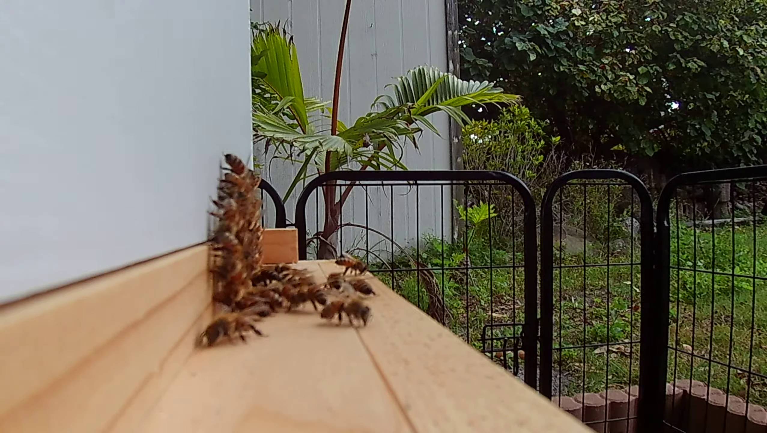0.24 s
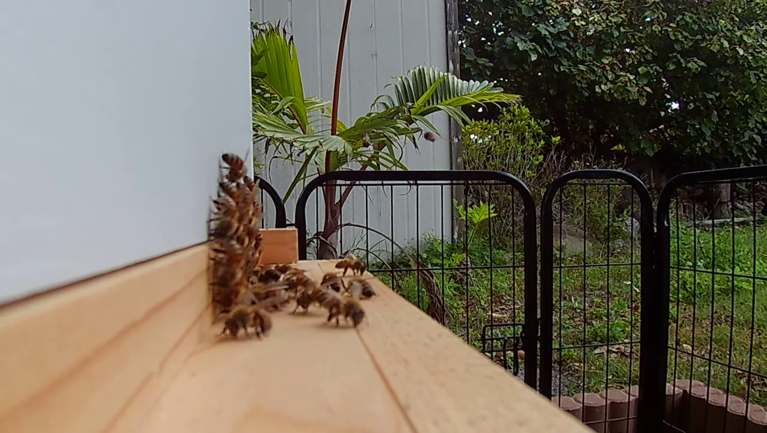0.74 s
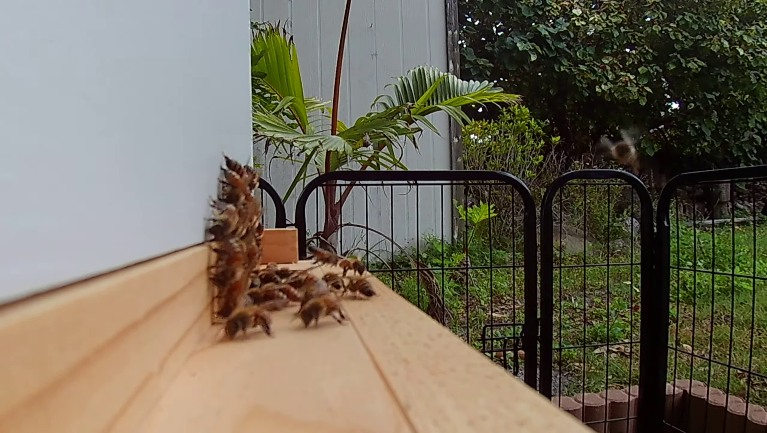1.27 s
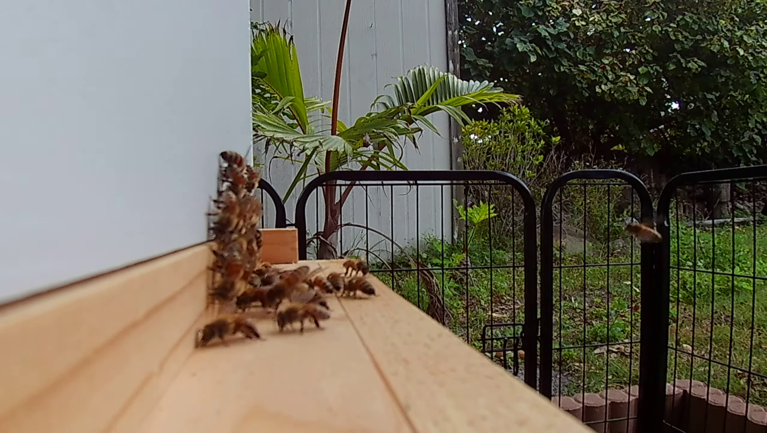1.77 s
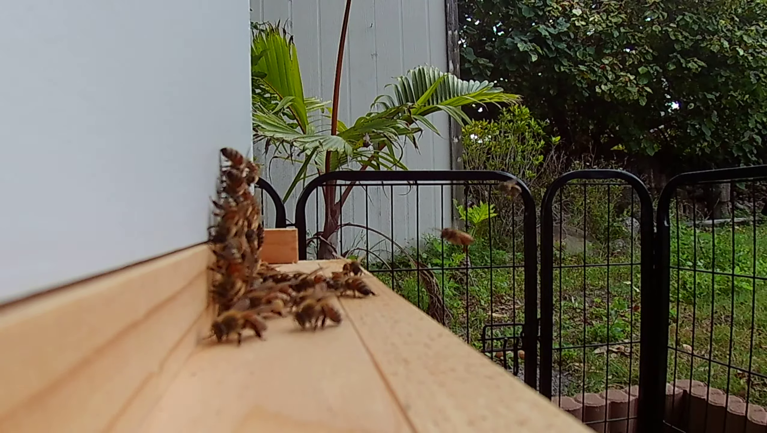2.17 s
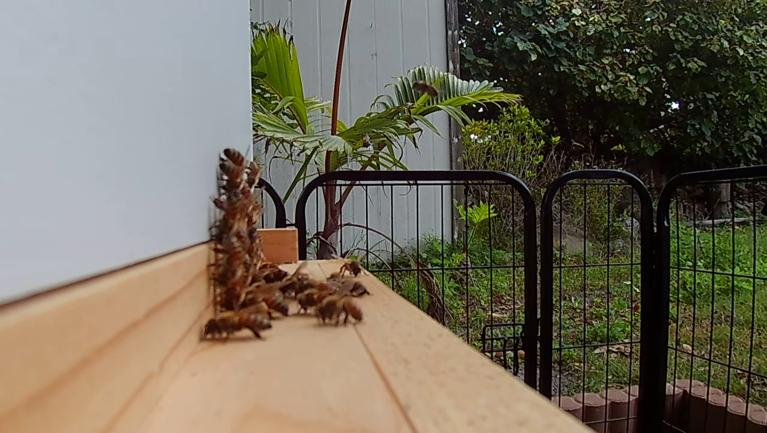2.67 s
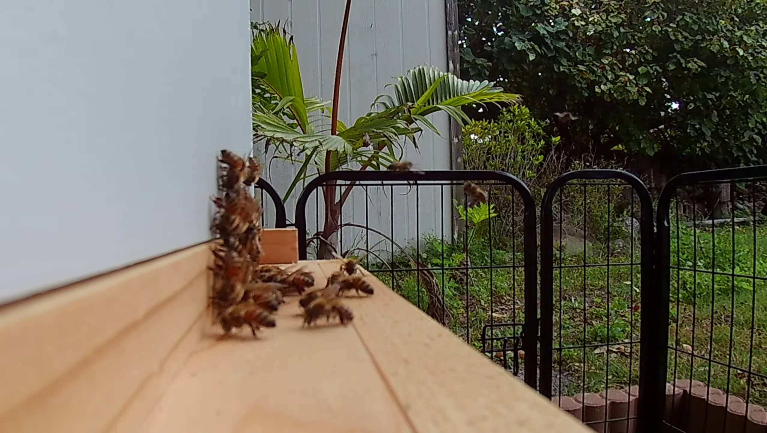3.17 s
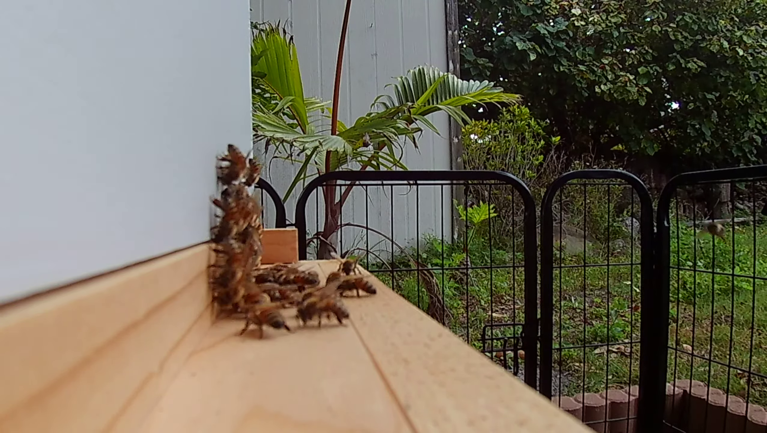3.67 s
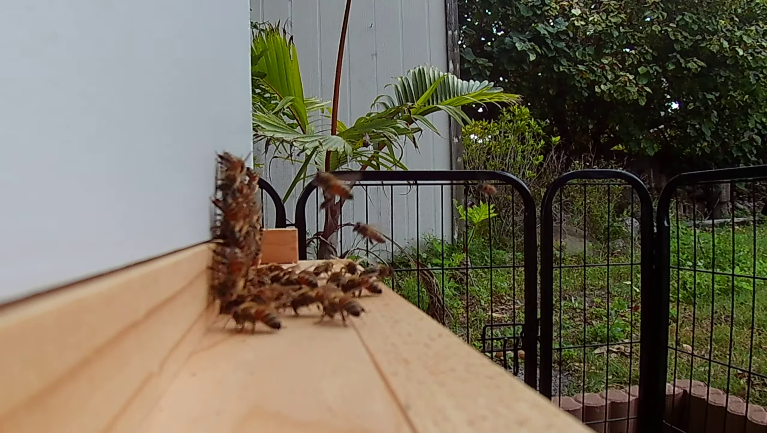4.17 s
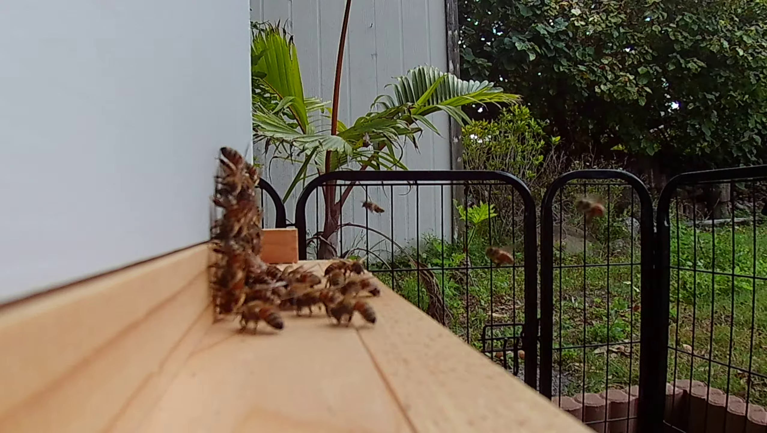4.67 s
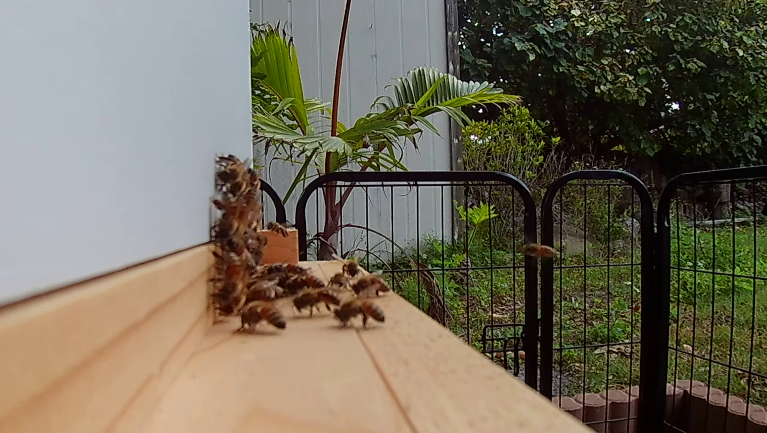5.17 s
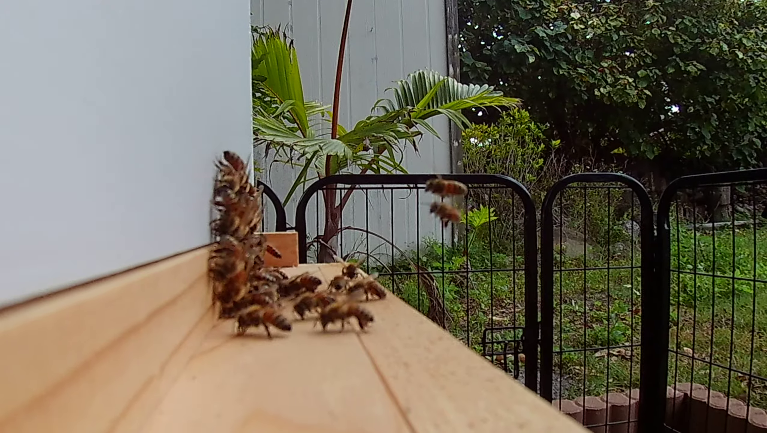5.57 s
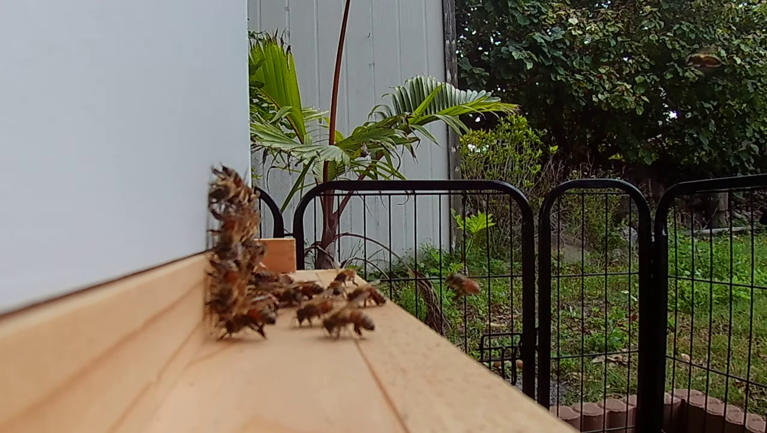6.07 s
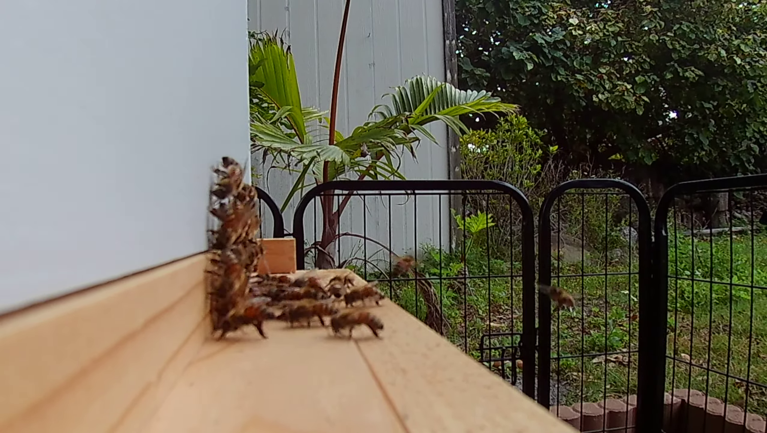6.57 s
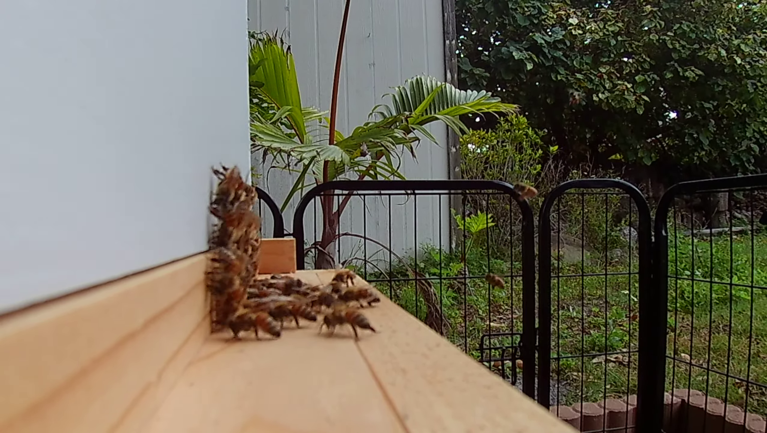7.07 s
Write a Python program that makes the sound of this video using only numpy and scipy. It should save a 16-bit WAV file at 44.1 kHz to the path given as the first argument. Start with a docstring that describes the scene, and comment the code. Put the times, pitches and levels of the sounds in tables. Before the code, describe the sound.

Close single-channel pickup beside a hive entrance outdoors. At first there is only dull, distant air noise, then bees drift in with low fluttering buzzes, some rounder and closer, others brief passing hums. Fine scratchy rustling stays very faint. Past the middle, something small brushes the microphone and raps it twice, dry and abrupt, far louder than the bees, before thin wavering hums resume.

```python
"""Bees at a hive entrance

A quiet garden from the landing board: distant outdoor noise in the air, filtered from random noise.
Close by, feet and wings rustle and scratch on the wood, as filtered grains that come in spurts.
Foragers hum further off and single wing tones waver past, harmonic series gaining bass as they near.
Something small, likely a bee, brushes the microphone's case and knocks on it hard twice, among
lighter touches: decaying modes of the case, each contact with a brief noisy tail.
"""
import sys
import numpy as np
from scipy import signal
from scipy.fft import rfft, irfft
from scipy.io import wavfile

SR = 44100
rng = np.random.default_rng(int(sys.argv[2]) if len(sys.argv) > 2 else 0)


def transcribe(signal):
    """Save signal, clipped to [-1, 1], as a 16-bit WAV file at the path in sys.argv[1]."""
    frames = np.atleast_2d(signal).T
    limited = np.clip(frames, -1, 1)
    pcm = np.round(limited * 32767).astype(np.int16)
    wavfile.write(sys.argv[1], SR, pcm)


N = 323253
TIME = np.arange(N) / SR  # s

# Spectrum of the distant garden air: (frequency [Hz], relative density [dB per Hz])
AIR_SPECTRUM = [(20, -17), (35, 0), (65, 1), (120, -1), (190, -7), (330, -9), (700, -10.5), (1250, -12),
                (1700, -19.5), (2300, -29), (3000, -34), (4000, -30.5), (7000, -41), (7900, -57),
                (9300, -43), (12000, -47.5), (13100, -35), (14000, -47.5), (15500, -44.5)]
# Rustle of the bees on the board, before its spurts: (time [s], level [dB])
RUSTLE_LEVEL = [(0, -80), (.35, -84), (.85, -78), (1, -83), (1.15, -78), (1.6, -85), (1.72, -69.5),
                (2.1, -86), (2.45, -78), (3.8, -85.5), (4.4, -76), (4.7, -81), (5.1, -74), (5.4, -73.5),
                (5.9, -73), (6.2, -78), (7.33, -87)]
# Feet, wings and bodies rubbing close to the microphone:
# (time [s], level before fading [dB], centre [Hz], sharpness [Q], length [s])
SCRATCHES = [(0.051, -52.5, 4500, 3.3, 0.0039), (1.903, -60, 3860, 2.4, 0.016),
             (1.964, -54, 4610, 1.84, 0.0055), (4.906, -51.5, 7490, 1.4, 0.0028),
             (5.237, -46.5, 1550, 1.5, 0.02), (5.239, -54.5, 4600, 3.4, 0.021),
             (5.244, -54, 8800, 11, 0.011), (5.273, -52.5, 1068, 1.5, 0.61), (5.275, -44.5, 950, 3.6, .012),
             (5.29, -55, 10300, 2.4, 0.0097), (5.291, -53, 1300, 1.3, .024), (5.332, -63, 1300, 1.3, .007),
             (5.334, -58.5, 4100, 2.3, .005), (5.373, -64.5, 3900, 2.7, 0.11), (5.411, -67, 4600, 2, .005),
             (5.424, -64.5, 4000, 2, .005), (5.696, -58, 8760, 5, 0.005), (5.7375, -37, 3600, 2.7, 0.008),
             (5.745, -38, 4020, 5.5, 0.022), (5.755, -44.5, 1004, 1.3, 0.13),
             (5.762, -39, 1190, 1.3, 0.021), (5.762, -59, 5240, 2.5, 0.017), (5.791, -48, 55.7, 0.75, 0.11),
             (5.7948, -55.5, 5400, 3, 0.0031), (5.802, -62, 5360, 1.6, 0.0034), (5.822, -60, 6500, 1, .003),
             (5.8775, -56, 4110, 3, .004), (6.412, -69, 6760, 1.36, 0.1), (6.501, -54.5, 4980, 3.8, 0.0073)]
# Foragers further off, how busy the entrance is: (time [s], level [dB])
CROWD_LEVEL = [(0, -89), (.8, -68.5), (1.3, -60.5), (2.2, -65.5), (3, -71), (3.6, -60), (4.3, -62.5),
               (5.1, -61), (5.8, -57.5), (6.2, -63), (6.8, -62), (7.33, -62)]
# Overtones of a wingbeat, one a row from the third harmonic up: (relative level [dB])
OVERTONE_LEVELS = [-0.5, -0.5, -1, -6.5, -7, -17, -21, -20.5, -20, -19.5]
# Wing hums near the board, one path a row. In turn: a bee comes up; a close hum, perhaps of two or three
# bees, swells three times; one hovers; one hum comes and goes until a contact; one drifts past with
# quicker wings; one arrives, sags, picks up.
# (fundamental [dB], overtones [dB], lead of the fifth harmonic [dB], path), the first two at CLOSE_DB;
# path: (time [s], wingbeat [Hz], octave level [dB])
FLIGHTS = [ (-6, -10, 12, [(.9, 222, -78), (1.15, 218.1, -90), (1.19, 222.6, -75), (1.24, 235.3, -68),
           (1.275, 234.3, -63), (1.305, 220, -72), (1.345, 229.7, -62), (1.42, 219, -76)]),
           (-1, -4, 1.3, [(1.4, 236.3, -67), (1.45, 237.8, -59), (1.5, 226.1, -55), (1.55, 213.6, -62),
           (1.6, 228.9, -57.5), (1.64, 220.7, -56.5), (1.71, 212.6, -61.5), (1.77, 212.9, -61.5),
           (1.81, 208.7, -62), (1.87, 216.3, -59), (1.92, 226.8, -58), (1.98, 214.4, -58.5),
           (2.05, 212, -65), (2.14, 213, -78)]), (-2, -9, 2.9, [(2.3, 212.3, -67), (2.52, 230.9, -62.5),
           (2.62, 225.5, -71), (2.74, 229.4, -67.5), (2.85, 225, -65), (2.95, 219.5, -68),
           (3.05, 223.4, -64), (3.2, 224.6, -65), (3.38, 237.4, -63), (3.52, 221.7, -85)]),
           (-3, -5, 2.7, [(3.7, 225, -79), (4.02, 224.2, -60.5), (4.2, 228, -89), (4.35, 225.6, -61.5),
           (4.55, 225.4, -75), (4.88, 232.5, -62.5), (5.08, 218.5, -65.5), (5.2, 206.6, -74),
           (5.42, 214.6, -62)]), (-6, -6, 0.92, [(5.53, 240, -65.5), (5.66, 243.2, -54.5),
           (5.92, 249.4, -65.5), (6.03, 244.7, -79), (6.16, 238.3, -65.5), (6.55, 235.2, -67.5)]),
           (-13, -5.5, 8, [(6.62, 237.3, -66), (6.77, 245.4, -68.5), (6.85, 247.6, -64), (6.93, 252, -58),
           (7.02, 251.3, -67), (7.06, 245.9, -58), (7.11, 228.8, -66), (7.18, 236.3, -65),
           (7.25, 251.7, -75), (7.33, 248.8, -62)])]
# A turning bee beams its overtones towards the microphone or away:
# (time [s], third harmonic [dB], fourth [dB], fifth [dB])
BEAM = [(1.1, -3, -6, 0), (1.38, -2, -2, -1.5), (1.44, -15, -2, -15), (1.52, 2, 3, -10), (1.55, 2, -6, -10),
        (1.61, -1, 6, -12), (1.68, 0, -2, 5), (1.76, -3, -4, -2), (1.82, 6.5, 8, -1), (1.94, -2, -1.5, -15),
        (1.99, -2, -4, -3), (2.2, -1, -2.5, -3.5), (6.6, -1.5, -2.5, -2), (6.95, -2, 4, 1),
        (7.12, 3, -5.5, 1.5), (7.33, 7, -7, -1)]
# Bees that dart by: (time nearest [s], half length [s], first wingbeat [Hz], last wingbeat [Hz],
# octave [dB], fundamental [dB], overtones [dB], lead of the fifth harmonic [dB])
DARTS = [(1.575, 0.0307, 208, 243, -74, -69.5, -73, 13), (2.22, 0.088, 210.9, 208.2, -54, -72, -65.5, -18),
         (3.18, 0.082, 226, 228.7, -73, -75, -80, 14.5), (3.96, 0.12, 221.5, 232.8, -79, -81, -74, 11.5),
         (4.1, 0.0995, 255.5, 207, -63.5, -59, -82, 8), (4.333, 0.047, 233.2, 228, -68, -78, -66.5, 6.5),
         (4.625, 0.14, 203.8, 191.3, -62, -64, -77, 2), (5.052, .12, 260, 270.5, -65, -66, -70, -2),
         (6.708, .04, 261.3, 239.3, -60, -74, -64, -3), (6.721, 0.19, 275, 260.7, -72, -61, -76, 10),
         (6.92, .04, 266.1, 254.2, -61, -80.5, -71, -11), (7.28, 0.1012, 238.3, 258.2, -69, -57.5, -67, 1)]
# Contacts with the microphone's case:
# (time [s], level [dB], top of the push [Hz], favoured by the struck spot [Hz], favoured by [dB])
KNOCKS = [(5.237, -47, 4700, 4200, -3), (5.2447, -39.5, 10000, 1080, 15), (5.355, -32.5, 1724, 1200, 0),
          (5.3609, -33, 1710, 1110, 0), (5.384, -45.5, 4600, 4100, 6.5), (5.51005, -1.5, 1700, 600, 5),
          (5.5108, -2.8, 14540, 1330, -1), (5.5162, -24, 14600, 9600, 1), (5.5598, -34.5, 6500, 4500, -16),
          (5.5647, -37, 10500, 4030, -14.5), (5.5782, -40, 13500, 4000, -6),
          (5.696, -32.5, 2540, 1300, -3.5), (5.7123, -32.5, 9800, 1000, 14), (5.738, 1.5, 2710, 555, 2)]
# Modes of the case: (frequency [Hz], level [dB], decay by 60 dB [s])
CASE_MODES = [(125, -18, .026), (270, -12, .012), (540, -9.5, .008), (850, -9, .010), (1280, -11, .014),
              (1700, -7, .006), (2400, -8, .005), (3100, -10, .007), (3950, -5, .007), (5300, -8, .007),
              (9450, -9, .005), (12400, -24, .004), (14400, -25, .004), (385, -36, .36), (1281, -48, .23),
              (3779, -32, .1), (335, -25, .025), (925, -20, .025)]
# Antiresonances of the case: (frequency [Hz], sharpness [Q])
CASE_DIPS = [(2790, 26), (4680, 20), (7900, 7.2)]
# Short fading noise bands after any contact:
# (delay [s], level against the knock [dB], centre [Hz], sharpness [Q], length [s])
KNOCK_TAIL = [(.001, -23, 1000, 0.55, .022), (.002, -26, 3700, 1.3, 0.023), (0.002, -33, 9600, 3.2, 0.023),
              (.022, -50, 1110, 1.8, 0.073)]

AIR_DB = -55
# Close by, air pushed by the stroke grows faster than the buzz: dB gained per dB of level above CLOSE_DB
CLOSE_DB, HUM_GROWTH, RASP_GROWTH = -63.5, 1.94, 0.56
FLUTTER_DB, FLUTTER_PER_S = 2.8, 28
# A light touch moves no bass: low edge at 0 dB, and how many dB lighter raise it by an octave
PUSH_LOW_HZ, LIGHTER_DB_PER_OCTAVE = 59.6, 12
TAIL_DB_PER_OCTAVE = 7  # a softer push, with a lower top, leaves a weaker tail
TOP_HZ = 15750


def undb(db):
    """Decibels to gain."""
    return 10 ** (np.asarray(db) / 20)


def unit(x):
    """Scale to rms 1."""
    return x / np.sqrt(np.mean(x ** 2))


def curve(rows):
    """Each column of a table after the time, joined by straight lines."""
    s, *columns = np.transpose(rows)
    return [np.interp(TIME, s, c) for c in columns]


def gain_at(hz, spectrum):
    """Gain of a (Hz, dB) spectrum at these frequencies."""
    f, db = np.transpose(spectrum)
    return undb(np.interp(np.log(hz + 1e-3), np.log(f), db))


def band(x, hz, q):
    """A resonance applied twice."""
    b, a = signal.iirpeak(min(hz, .45 * SR), q, fs=SR)
    return signal.lfilter(b, a, signal.lfilter(b, a, x))


def walk(rate, size=N):
    """Smooth chance that changes about rate times a second; spread near 1."""
    place = np.arange(size) * rate / SR + rng.random()
    step = place.astype(int)
    knots = rng.standard_normal(1024)
    ease = (1 - np.cos(np.pi * (place - step))) / 2
    return knots[step % 1024] * (1 - ease) + knots[(step + 1) % 1024] * ease


def add(out, s, x):
    """Mix a sound in at time s."""
    i = int(s * SR)
    out[i:i + len(x)] += x[:N - i]


def air(flicker_db=0.525, gust_db=2):
    """Distant outdoor noise: a light breeze stirs the bass, and the treble flickers slightly."""
    hz = np.arange(N // 2 + 1) * SR / N
    noise = rfft(rng.standard_normal(N)) * gain_at(hz, AIR_SPECTRUM)
    bass_share = 1 / (1 + (hz / 150) ** 4)
    bass = irfft(noise * bass_share, N) * undb(gust_db * walk(8))
    treble = irfft(noise * (1 - bass_share), N) * undb(flicker_db * walk(20))
    return unit(bass + treble) * undb(AIR_DB)


def grains(size):
    """Dense tiny clicks of uneven strength."""
    return rng.standard_normal(size) * undb(3 * rng.standard_normal(size))


def grain_bursts(rows, slip_db=3.5, slip_rate=500):
    """Fading bands of grains in spurts, as a rubbing body makes when it sticks and slips."""
    out, size = np.zeros(N), SR // 2
    for s, db, hz, q, length in rows:
        t = TIME[:size] / length
        spurts = grains(size) * undb(slip_db * walk(slip_rate, size))
        edges = np.clip(hz * np.exp(np.array([-.5, .5]) / q), 10, .45 * SR)
        burst = signal.sosfilt(signal.butter(3, edges, "band", fs=SR, output="sos"), spurts)
        fade = np.minimum(t * 10, 1) * np.exp(-2 * t)
        add(out, s, undb(db) * unit(burst) * fade)
    return out


def scratches(spurt_db=3.0):
    """Claws and wings on hard surfaces: a fine rustle that comes in spurts and a few clear scratches."""
    rustle = unit(band(grains(N), 5280, 1.7))
    rustle_db = curve(RUSTLE_LEVEL)[0] + spurt_db * walk(12)
    return rustle * undb(rustle_db) + grain_bursts(SCRATCHES)


def wings(hz, first_db, octave_db, rasp_db, fifth_db, beam_db=(0, 0, 0),
          waver=0.007, turn_db=2.0, sway_db=2.5, swish_db=-16):
    """The stroke gives the fundamental, its two halves the octave, the wing flips the overtones."""
    size = len(hz)
    phase = 2 * np.pi * np.cumsum(hz * (1 + waver * walk(35.12, size))) / SR
    tone = undb(first_db) * np.sin(phase)
    octave_gain = undb(octave_db + sway_db * walk(9.45, size))
    tone += octave_gain * np.sin(2 * phase + 2 * np.pi * rng.random())
    lead_db = {3: beam_db[0], 4: beam_db[1], 5: fifth_db + beam_db[2]}
    for k, db in enumerate(OVERTONE_LEVELS, 3):
        # each overtone beams its own way, so it swells and fades as the bee turns
        gain = undb(rasp_db + db + lead_db.get(k, 0) + turn_db * walk(8.62, size))
        tone += gain * np.sin(k * phase + 2 * np.pi * rng.random())
    # air swishes off the wing edges twice a beat
    swish = unit(band(rng.standard_normal(size), 5730, 3.4) * np.sin(phase) ** 2)
    # quick steering makes the whole tone flutter
    flutter = unit(undb(FLUTTER_DB * walk(FLUTTER_PER_S, size)))
    return np.sqrt(2) * tone * flutter + swish * undb(rasp_db + swish_db)


def dart(half, from_hz, to_hz, octave_db, first_db, rasp_db, fifth_db, wander=.01):
    """One brief pass: the tone swells, glides unsteadily and fades."""
    along = np.linspace(-2, 2, int(4 * half * SR))  # in half lengths from the nearest point
    hz = np.interp(along, [-1.5, 1.5], [from_hz, to_hz])
    hz = hz * (1 + wander * walk(11.16, len(along)))
    return wings(hz, first_db, octave_db, rasp_db, fifth_db) * np.cos(along * np.pi / 4) ** 2


def crowd(centre_hz=228, spread=.075, glide=0.0397, half_s=.06, scatter_db=2,
          octave_db=3, first_db=0, rasp_db=-1, fifth_db=2.0, count=110):
    """Further foragers: short overlapping passes, each on its own gliding wingbeat."""
    out = np.zeros(N)
    for i, (pitch, slope, length, size, fifth) in enumerate(rng.standard_normal((count, 5))):
        hz = centre_hz * np.exp(spread * pitch + glide * slope * np.array([-1, 1]))
        half = half_s * np.exp(.25 * length)
        tone = dart(half, *hz, octave_db, first_db, rasp_db, fifth_db + 2 * fifth)
        start = (i + rng.random()) / count * N / SR
        add(out, start, tone * undb(scatter_db * size))
    return unit(out) * undb(curve(CROWD_LEVEL)[0])


def flight(path, hum_db, rasp_db, fifth_db):
    """One wing hum near the board: the closer, the rounder its tone, fading at both ends of its path."""
    near = (TIME >= path[0][0]) & (TIME <= path[-1][0])
    hz, octave_db = (c[near] for c in curve(path))
    beam_db = [c[near] for c in curve(BEAM)]
    closeness = octave_db - CLOSE_DB  # dB
    first_db = CLOSE_DB + hum_db + HUM_GROWTH * closeness
    overtones_db = CLOSE_DB + rasp_db + RASP_GROWTH * closeness
    out = np.zeros(N)
    out[near] = wings(hz, first_db, octave_db, overtones_db, fifth_db, beam_db)
    out[near] *= signal.windows.tukey(near.sum(), .04)
    return out


def darts():
    """The brief nearer passes, each strongest at its nearest moment."""
    out = np.zeros(N)
    for s, half, *tone in DARTS:
        add(out, s - 2 * half, dart(half, *tone))
    return out


def case_dips(x):
    """The case passes little at its antiresonances."""
    for hz, q in CASE_DIPS:
        b, a = signal.iirnotch(hz, q, fs=SR)
        x = signal.lfilter(b, a, signal.lfilter(b, a, x))
    return x


def knocks(spot_q=0.71, choke=90, size=221):
    """Each contact pushes the case's modes; a soft push leaves the treble out, a light one the bass."""
    t = TIME[:SR // 2]
    ring = np.zeros(len(t))
    for k, (hz, db, t60) in enumerate(CASE_MODES):
        decay = np.exp(-np.log(1000) * t / t60)
        # successive modes of the table move the microphone in opposite directions
        ring += (-1) ** k * undb(db) * np.sin(2 * np.pi * hz * t) * decay
    ring = case_dips(ring)
    out = np.zeros(N)
    for s, db, high_hz, spot_hz, spot_db in KNOCKS:
        low_hz = min(PUSH_LOW_HZ * 2 ** (-db / LIGHTER_DB_PER_OCTAVE), high_hz / 2)
        push = signal.firwin(size, min(high_hz, .45 * SR), fs=SR)
        light = signal.butter(2, low_hz, "high", fs=SR, output="sos")
        struck = ring + undb(spot_db) * band(ring, spot_hz, spot_q)
        # a soft body stays on the case and chokes its ringing
        held = np.exp(-t * choke * (2000 / high_hz) ** 2)
        knock = np.convolve(signal.sosfilt(light, struck * held), push)
        add(out, s - size / 2 / SR, undb(db) * knock)
    return out


def knock_tails(hard_hz=12000):
    """Noise bands that follow each knock, weaker and duller after a soft one."""
    rows = []
    for s, db, high_hz, *_ in KNOCKS:
        softness_db = TAIL_DB_PER_OCTAVE * np.log2(high_hz / hard_hz)
        for delay, rel_db, hz, q, length in KNOCK_TAIL:
            dulling_db = 10 * np.log10(1 + (hz / high_hz / 2) ** 4)
            rows.append((s + delay, db + rel_db + softness_db - dulling_db, hz, q, length))
    return case_dips(grain_bursts(rows))


def scene():
    """Garden, bees and their contacts with board and microphone, in one channel."""
    far = air() + crowd()
    bees = darts()
    for hum_db, rasp_db, fifth_db, path in FLIGHTS:
        bees += flight(path, hum_db, rasp_db, fifth_db)
    contacts = scratches() + knocks() + knock_tails()
    return (far + bees + contacts)[None]


def record(dry):
    """The recorder cuts the top with a steep low-pass."""
    return signal.sosfilt(signal.ellip(8, .2, 70, TOP_HZ, fs=SR, output="sos"), dry)


dry = scene()
out = record(dry)
transcribe(out)
```